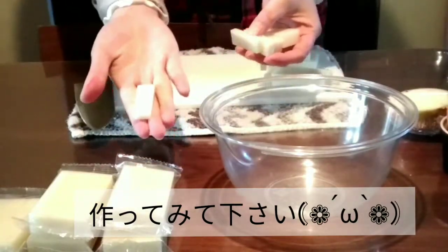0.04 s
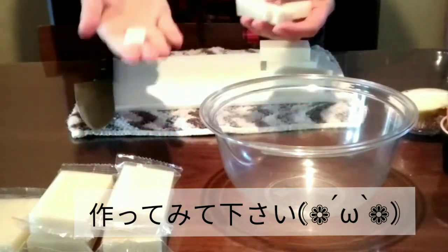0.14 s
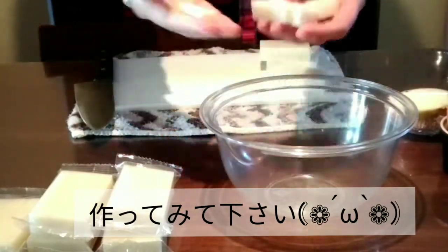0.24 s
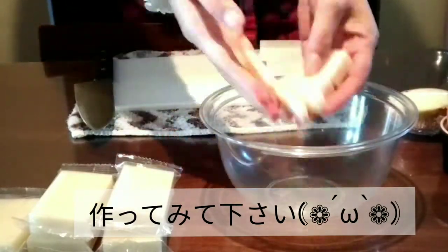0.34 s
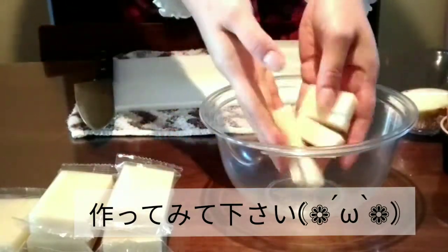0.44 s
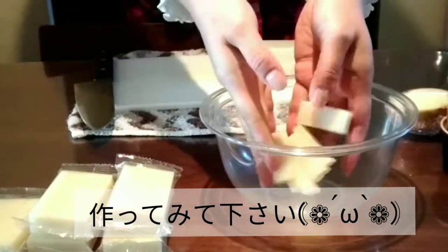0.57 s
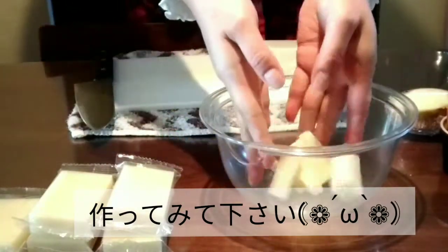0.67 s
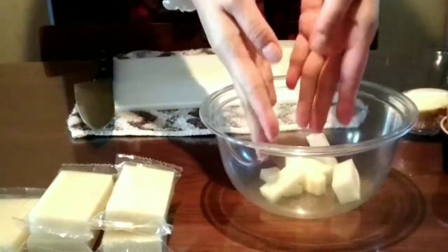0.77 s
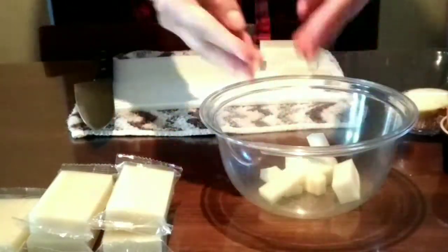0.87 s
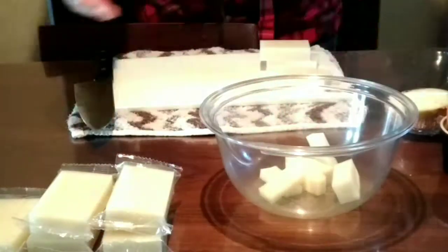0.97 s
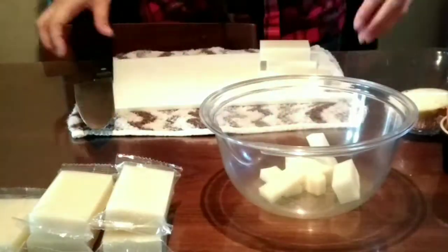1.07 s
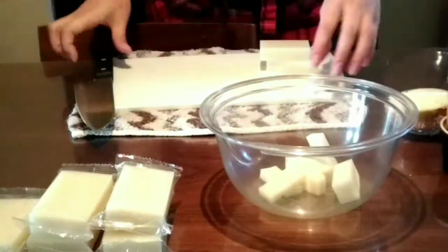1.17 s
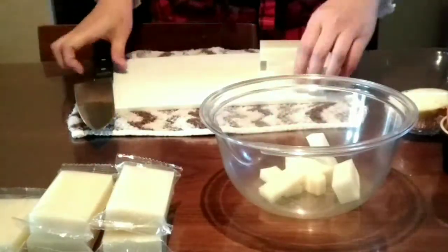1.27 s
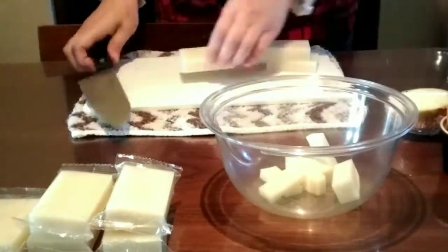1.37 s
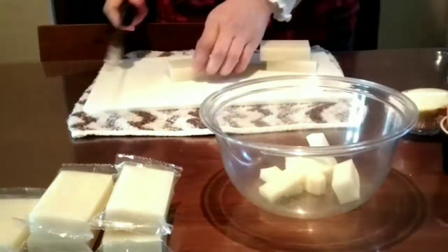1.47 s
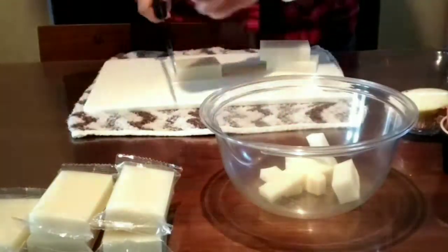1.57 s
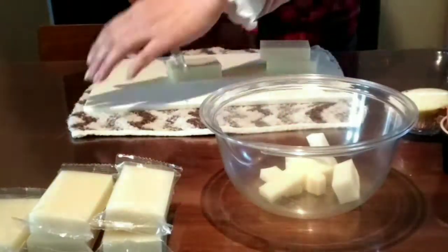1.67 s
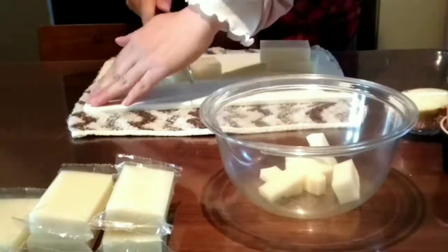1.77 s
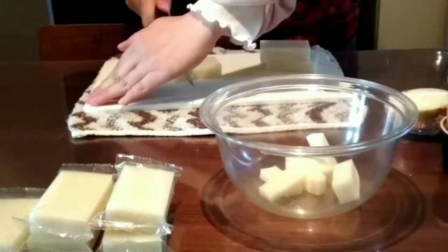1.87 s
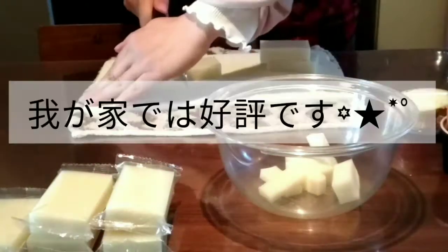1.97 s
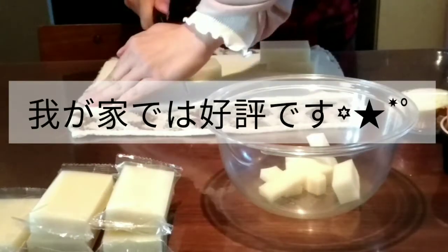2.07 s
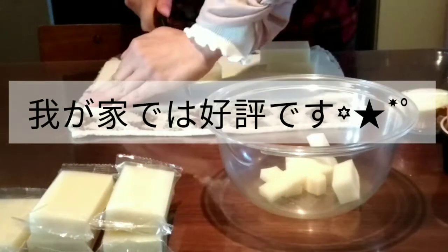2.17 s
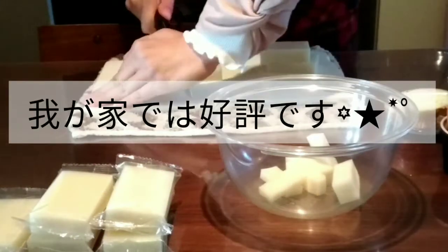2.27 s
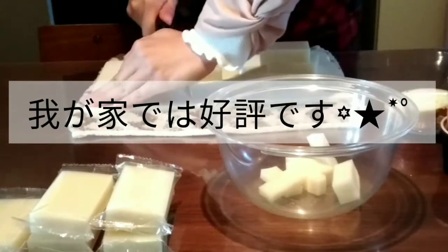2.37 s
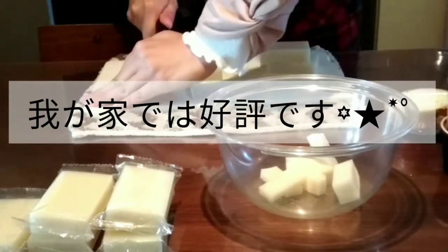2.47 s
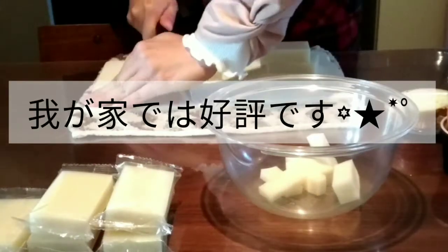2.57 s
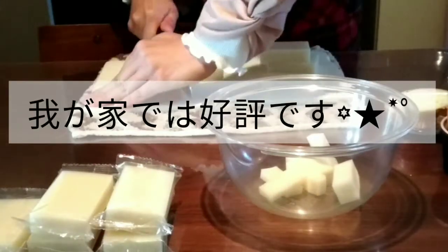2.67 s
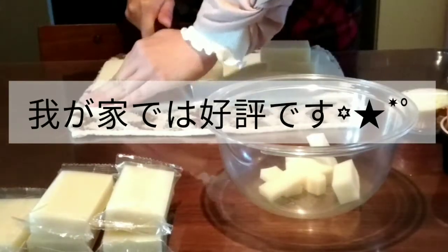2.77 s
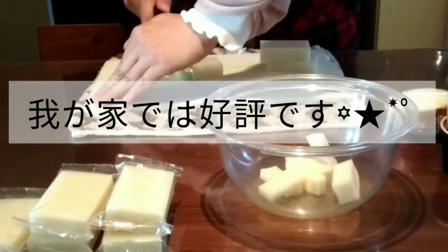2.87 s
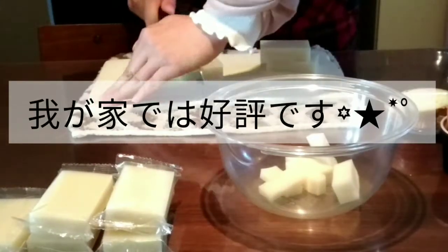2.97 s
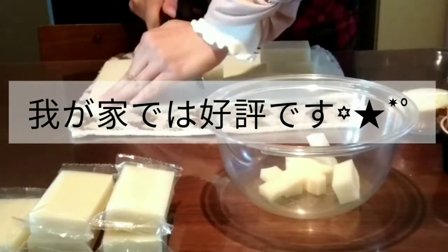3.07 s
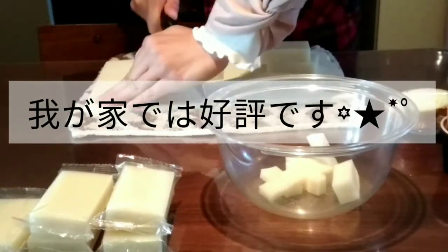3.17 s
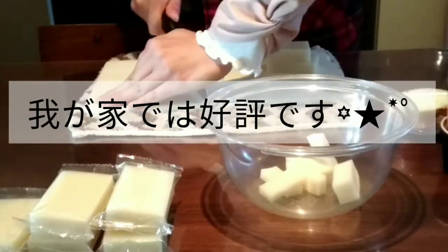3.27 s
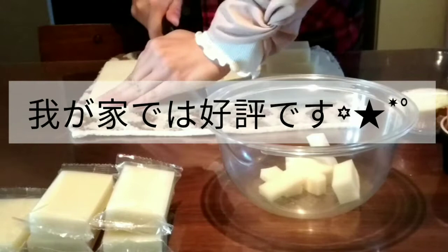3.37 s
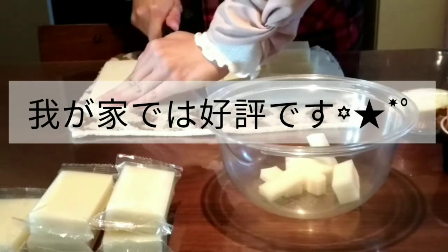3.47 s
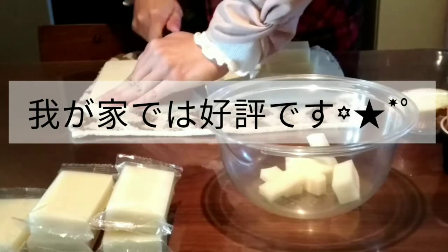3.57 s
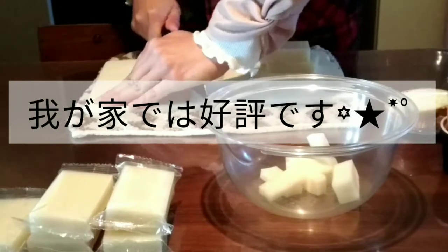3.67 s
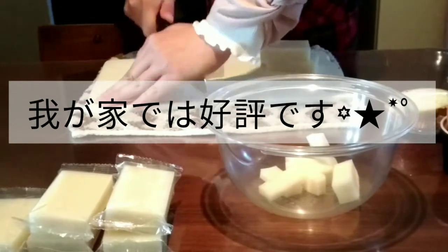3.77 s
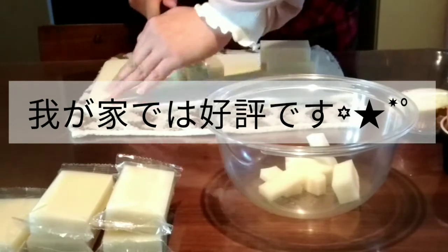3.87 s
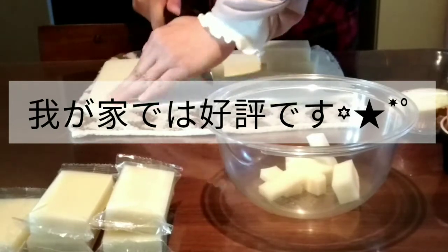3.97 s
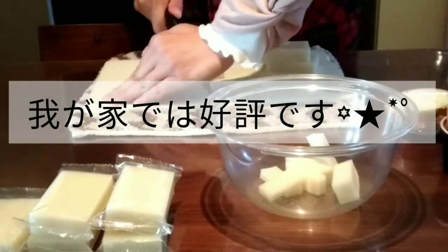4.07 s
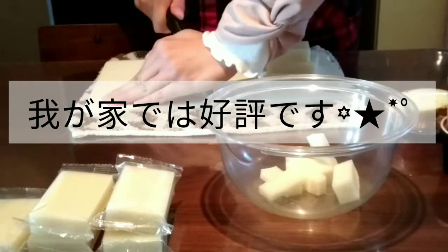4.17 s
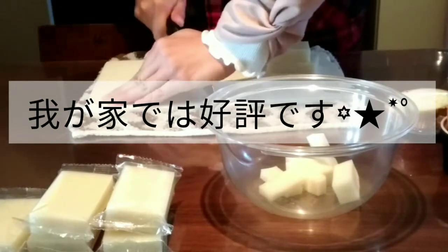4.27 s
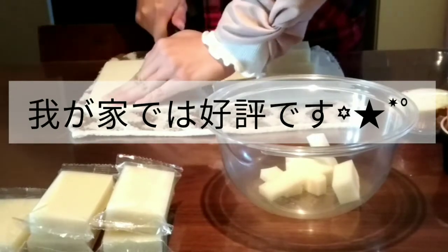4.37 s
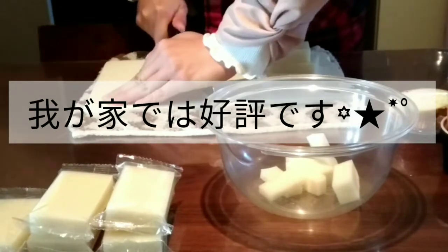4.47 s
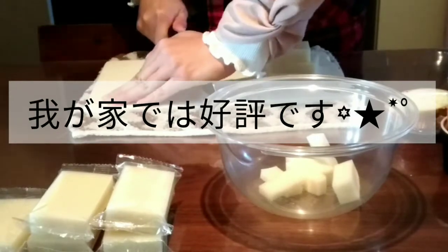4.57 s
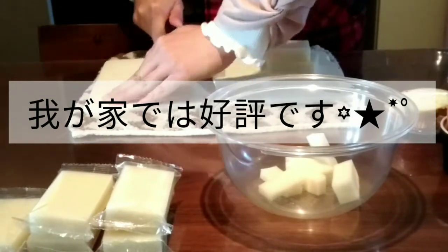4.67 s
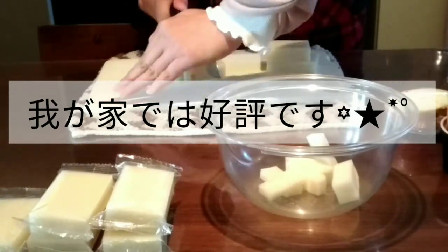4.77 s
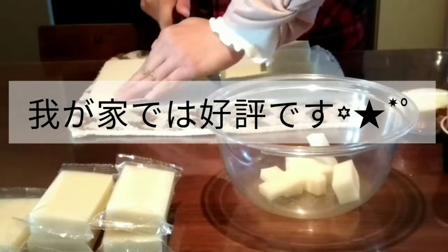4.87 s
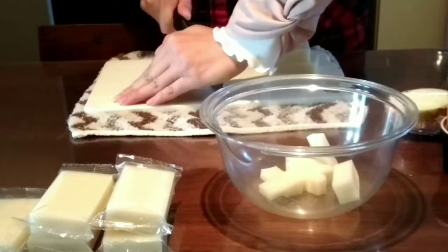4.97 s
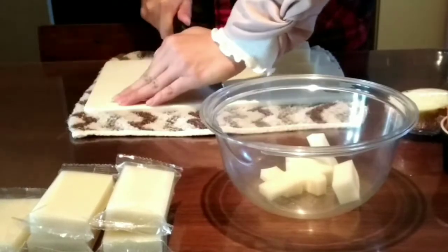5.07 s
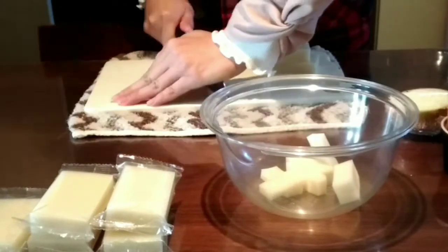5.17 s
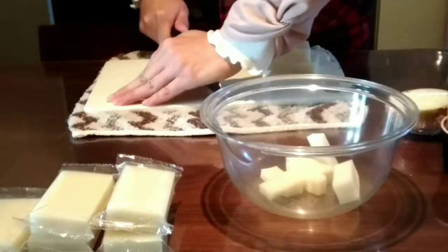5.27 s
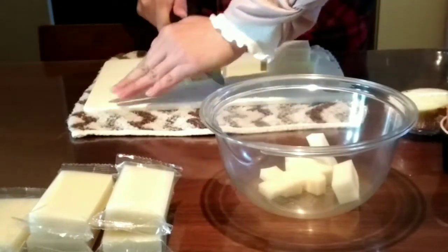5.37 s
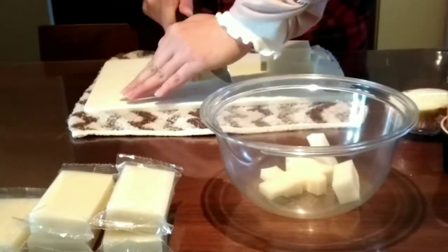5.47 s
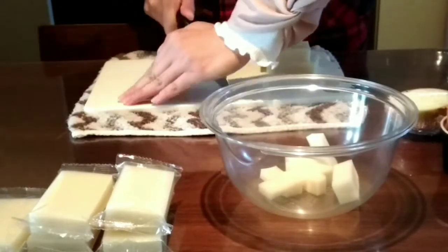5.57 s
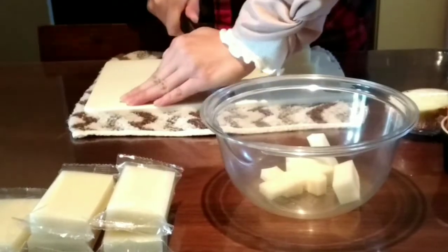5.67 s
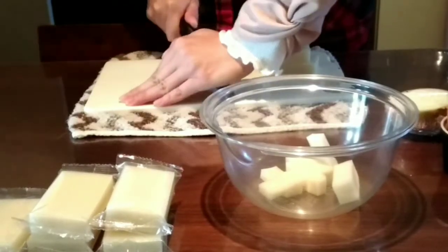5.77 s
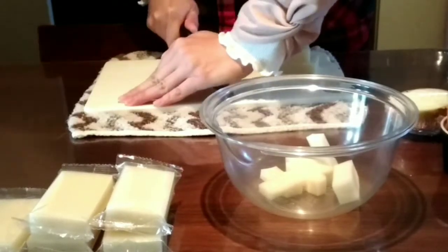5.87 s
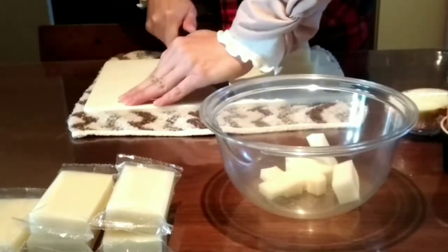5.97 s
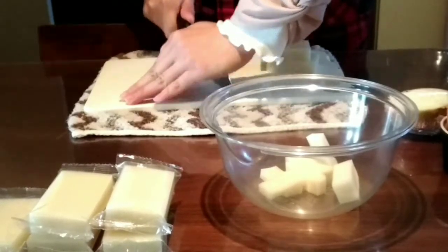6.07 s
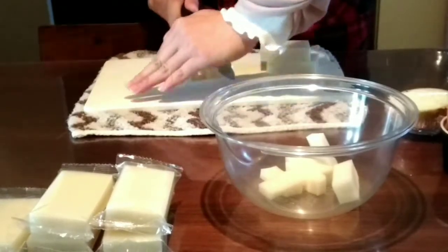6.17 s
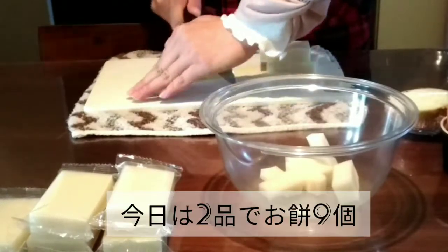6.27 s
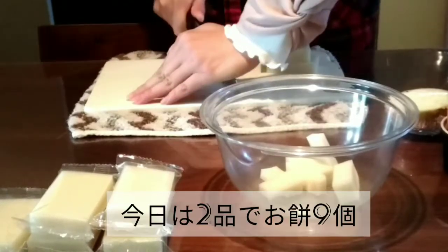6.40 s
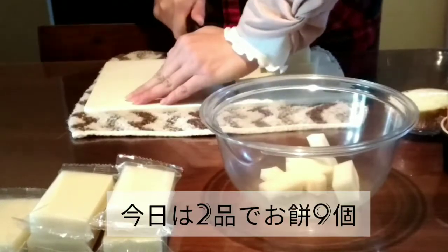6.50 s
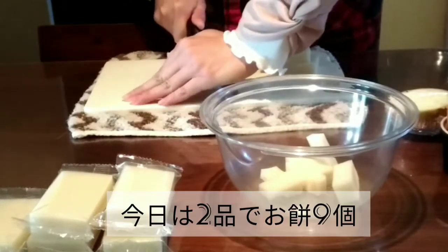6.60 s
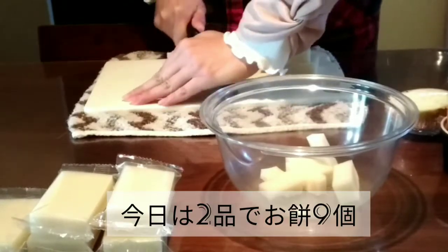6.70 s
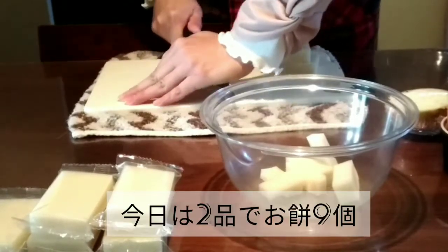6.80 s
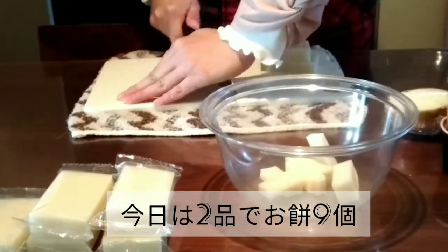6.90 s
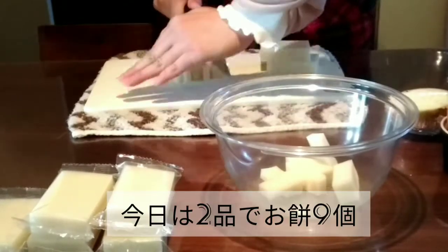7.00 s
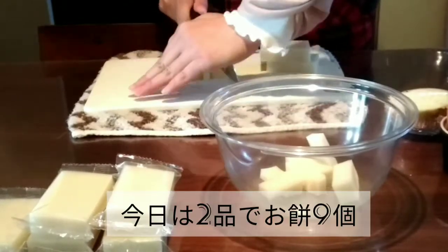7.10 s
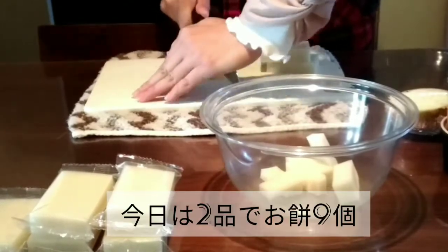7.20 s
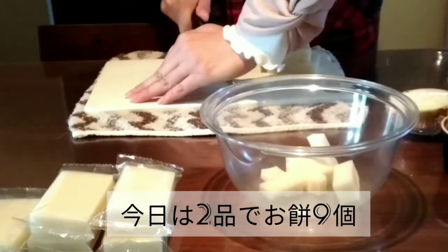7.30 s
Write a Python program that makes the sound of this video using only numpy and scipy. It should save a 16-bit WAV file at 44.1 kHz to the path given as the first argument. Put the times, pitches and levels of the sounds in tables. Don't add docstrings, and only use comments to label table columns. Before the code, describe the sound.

A brief burst of hard, dull knocks and small glassy clinks comes first as pieces drop into a bowl. Then sparse cutting: light touches, a strong wooden knock, sharp dry cracks from the block, a stepped crunch with a low table thump, and a final soft press and push. The close microphone catches small dry room echoes, low hum and passing tyres outside.

```python
import sys
import numpy as np
from scipy import signal
from scipy.io import wavfile

SR = 44100
rng = np.random.default_rng(int(sys.argv[2]) if len(sys.argv) > 2 else 0)


def to_wav(sig):
    pcm = np.clip(np.atleast_2d(sig), -1, 1) * 32767
    pcm = np.round(pcm).astype(np.int16)
    wavfile.write(sys.argv[1], SR, pcm.T)


def volts_from_db(level):
    exponent = np.asarray(level, float) / 20
    return 10 ** exponent


N = 323782

# (time [s], knock [dB], bowl foot [dB], crackle [dB])
DROP_LANDINGS = [(0.337, -56.5, -65, -90), (0.456, -48, -59, -69), (0.479, -65, -55, -67),
                 (0.504, -49.5, -55.5, -70), (0.5511, -23, -32.5, -53), (0.555, -50, -46, -47.5),
                 (0.571, -55, -38.5, -55), (0.58, -41, -40, -54.5), (0.591, -49, -40, -69),
                 (0.601, -37.5, -44, -53.5), (0.607, -53, -36.5, -60.5), (0.619, -64, -37.5, -59),
                 (0.634, -21, -38, -45), (0.642, -30, -33, -63.5), (0.647, -45, -54, -72),
                 (0.663, -55, -60, -64)]
# (time [s], knock [dB], knock pitch [Hz], edge [dB], loss per further crack [dB])
BLOCK_CRACKS = [
    (3.66, -29, 846, -46.5, 14.5),
    (4.563, -47, 816, -84, 22),
    (4.58, -31.5, 807, -42, 5),
    (4.598, -38.5, 890, -49, 4.5),
    (4.622, -50, 1000, -54, 3),
]
# (time [s], knock [dB], board [dB], crackle [dB])
FIRST_CUT = [
    (2.372, -55, -41, -75),
    (2.378, -55, -43, -70),
    (2.385, -62, -40.5, -69),
    (2.396, -60, -47.5, -63),
    (2.409, -60, -51, -66),
]
HARD_CUT = [
    (5.039, -46, -30, -47),
    (5.045, -32, -43, -51),
    (5.05, -31, -31, -52),
    (5.061, -36, -35.5, -61),
    (5.067, -35, -36, -62),
    (5.074, -43, -37.5, -64),
    (5.086, -59, -52, -72),
    (5.098, -48, -41.5, -60),
]
LAST_CUT = [
    (6.644, -59, -47.5, -62),
    (6.652, -60, -52.5, -64),
    (6.665, -53, -41, -68),
    (6.681, -65, -52, -66),
    (6.698, -67, -59, -67),
]


def rms_one(x):
    return x / np.sqrt(np.mean(x ** 2) + 1e-20)


def at_hz(points, hz):
    table = np.array(points)
    return np.interp(np.log(hz), np.log(table[:, 0]), table[:, 1])


def drift(rate):
    r = np.exp(-80 * np.pi * rate / SR)
    steps = rng.standard_normal(N // 40 + 2002)
    slow = signal.lfilter([1], [1, -2 * r, r * r], steps)[2000:]
    return np.interp(np.arange(N) / 40, np.arange(len(slow)), rms_one(slow))


def smooth(x, seconds):
    r = np.exp(-1 / (seconds * SR))
    return signal.lfilter([1 - r], [1, -r], x)


def band(x, low_hz, high_hz, order):
    return signal.sosfilt(signal.butter(order, [low_hz, high_hz], "band", fs=SR, output="sos"), x)


def ring(clicks, hz, t60):
    r, w = volts_from_db(-60 / (t60 * SR)), 2 * np.pi * hz / SR
    return signal.lfilter([0, np.sin(w)], [1, -2 * r * np.cos(w), r * r], clicks + 1e-18)


def clicks_at(times, level_db):
    out = np.zeros(N)
    out[(np.asarray(times) * SR).astype(int)] = volts_from_db(level_db)
    return out


def strike(times, level_db, modes, spread_db, contact_s):
    share_db = spread_db * rng.standard_normal((len(times), len(modes)))
    rings = np.zeros(N)
    for k, (hz, db, t60) in enumerate(modes):
        blows = clicks_at(times, level_db + db + share_db[:, k])
        rings += (-1) ** k * ring(blows, hz, t60)
    return -smooth(smooth(rings, contact_s), contact_s)


def knocks(times, level_db, pitch_hz, cycles):
    out, t = np.zeros(N), np.arange(6000) / SR
    for s, db, hz, turns in np.broadcast(times, level_db, pitch_hz, cycles):
        age = t * hz / turns
        swell = (age * np.exp(1 - age)) ** 2
        start = int(s * SR)
        out[start:start + len(t)] -= volts_from_db(db) * swell * np.sin(2 * np.pi * hz * t)
    return out


def contact(rows, body, body_db, knock_hz, overtone_db, cycles):
    s, knock, body_share, _ = np.transpose(rows)
    rung = strike(s, body_share + body_db, body, spread_db=3, contact_s=.00025)
    overtone = overtone_db + 0.79 * (knock + 45)
    return rung + knocks(s, knock, knock_hz, cycles) + knocks(s, overtone, 1200, cycles=1.05)


def crumbs(rows, rise_s, fall_s):
    s, crackle = np.transpose(rows)[[0, -1]]
    return smooth(smooth(clicks_at(s, crackle), rise_s), fall_s) * fall_s * SR


def strokes(start_s, level_db, held_s, rise_db_per_s, fall_db_per_s):
    late = np.arange(N)[:, None] / SR - start_s
    rise = rise_db_per_s * np.minimum(late, 0)
    fall = fall_db_per_s * np.maximum(late - held_s, 0)
    return np.max(level_db + rise - fall, axis=1)


def banded_noise(spectrum, patchy_db):
    # (frequency [Hz], likeness [-1 to 1])
    likeness = [(60, 0.88), (180, 0.93), (550, 0.47), (1640, -0.23), (4960, 0.17), (14900, -0.21)]
    out, edges = 0, 25 * 2 ** np.arange(0, 9.4, 1 / 3)
    white = rng.standard_normal((2, 2, N + 8000))
    for k, (low, high) in enumerate(zip(edges, edges[1:])):
        mid, side = band(white[k % 2], low, high, order=2)[:, -N:]
        hz = np.sqrt(low * high)
        alike = np.clip(at_hz(likeness, hz), -1, 1)
        gain = volts_from_db(at_hz(spectrum, hz) + patchy_db * drift(19.6))
        out = out + gain * (np.sqrt(1 + alike) * mid + np.sqrt(1 - alike) * side * [[1], [-1]])
    return rms_one(out)


def room_hum():
    # (frequency [Hz], level [dB per Hz])
    hum_spectrum = [(15, -36), (25, -2), (55, 0), (94, -3), (119, -7.5), (202, -2), (237, -11), (353, -9),
                    (448, -14), (539, -15), (584, -21), (1050, -20.5), (1360, -23.5), (2940, -28),
                    (14000, -37.5)]
    return volts_from_db(-61.5 + 0.5 * drift(1.0)) * banded_noise(hum_spectrum, patchy_db=1.55)


def road_outside():
    # (frequency [Hz], level [dB per Hz])
    road_spectrum = [(250, 0), (500, 11), (950, 9), (1500, 5), (2240, 7), (3000, -7.5), (5000, -73)]
    # (time [s], level [dB])
    traffic = [
        (0, -71),
        (.8, -74),
        (2.2, -81),
        (3.5, -72.5),
        (4.5, -64),
        (5.9, -69),
        (6.45, -76),
        (7.34, -67),
    ]
    s, db = np.transpose(traffic)
    level_db = np.interp(np.arange(N) / SR, s, db, left=-140, right=-140)
    return volts_from_db(level_db) * banded_noise(road_spectrum, patchy_db=0.15)


def room_echoes(x):
    t60_s = 0.12
    t = np.arange(int(.4 * SR)) / SR
    hits = rng.random((2, len(t))) < .02 + 3.0 * t
    echoes = rng.standard_normal((2, len(t))) * hits
    echoes = echoes / np.sqrt(0.0071 + 8.7 * t) * volts_from_db(-60 * t / t60_s) * (t > .004)
    echoes = band(echoes, 600, 4900, order=1)
    echoes = echoes / np.sqrt(np.sum(echoes ** 2) / 2)
    return signal.fftconvolve(x[None], echoes, axes=1)[:, :N]


def table_thumps():
    # (time [s], level [dB], pitch [Hz], time to the peak [cycles])
    thumps = [(0.55, -36.5, 123, 1.5), (0.575, -45, 101, 0.88), (0.601, -54, 89, 0.82),
              (0.638, -44, 106, 1), (1.232, -50.5, 195, 1.6), (2.385, -33.5, 86.5, 0.4),
              (2.405, -46, 64, 1.34), (2.527, -37.5, 103, 1.5), (2.531, -40.5, 63.6, 1.37),
              (4.4228, -39, 63, 0.48), (4.587, -48.5, 374, 1.8), (5.045, -34.5, 64, 1.05),
              (5.049, -32.5, 105, 1), (5.069, -50, 70, 2.4), (5.793, -38, 76, 0.94),
              (6.642, -36, 78.5, 0.91), (6.658, -41.5, 121, 0.88), (6.695, -46, 70, 0.73),
              (5.834, -50, 65, 0.91), (.005, -56, 47.3, 1.9), (.11, -64, 44.6, 1.7)]
    return knocks(*np.transpose(thumps))


def slides():
    # (time [s], rub [dB], rustle [dB], held [s])
    moves = [
        (.464, -67, -92, .005),
        (.488, -78, -66, .002),
        (1.336, -63, -70.5, 0.013),
        (1.402, -88, -69, .002),
        (1.43, -84, -71.5, 0.07),
        (3.452, -91, -60.5, .002),
        (6.764, -62, -72.5, 0.0064),
        (6.815, -54.5, -71, 0.0027),
    ]
    s, rub, rustle, held = np.transpose(moves)
    rub_db = strokes(s, rub, held, rise_db_per_s=650, fall_db_per_s=750)
    rustle_db = strokes(s, rustle, held, rise_db_per_s=650, fall_db_per_s=750)
    slips = (rng.random(N) < 2500 / SR) * rng.standard_normal(N)
    stirred = ring(slips, 820, .012) - .6 * ring(slips, 500, .014) - .7 * ring(slips, 1200, .008)
    rubbing = rms_one(band(stirred, 250, 1430, order=2)) * smooth(volts_from_db(rub_db), 0.005)
    return rubbing, smooth(volts_from_db(rustle_db), 0.0013)


def blade_drag():
    # (time when loudest [s], level [dB])
    drags = [
        (1.69, -78.5),
        (1.99, -80),
    ]
    s, db = np.transpose(drags)
    level_db = strokes(s, db + 2.5, 0, rise_db_per_s=103, fall_db_per_s=101)
    return volts_from_db(level_db) * rms_one(band(rng.standard_normal((2, N)), 2470, 3140, order=2))


def ticks():
    # (time [s], level [dB], fall [s])
    edge_contacts = [(.477, -61, .004), (0.4805, -55.5, .004), (0.55, -40, 0.0012), (0.5517, -33.5, 0.001),
                     (0.568, -48, .001), (0.6052, -43, 0.0012), (.6085, -57, 0.0013), (0.6345, -49, 0.0013),
                     (0.642, -41, 0.0019), (0.648, -55, 0.0016), (.652, -53, 0.0017), (.581, -48, 0.0014),
                     (.596, -53, .0013), (.619, -56, .0013), (2.516, -58, 0.0047), (2.5241, -48, 0.0016),
                     (2.529, -53, 0.0045), (5.047, -51.5, 0.0041), (5.057, -53, .005), (5.786, -68, .004),
                     (5.7906, -65, 0.0024), (5.797, -67, 0.0033), (5.803, -59, .004), (6.645, -63, .004),
                     (6.653, -54, 0.0028), (6.661, -56, 0.0031)]
    return sum(crumbs([(s, db)], .0001, fall) for s, db, fall in edge_contacts)


def taps():
    # (time [s], level [dB], pitch [Hz], time to the peak [cycles])
    single_knocks = [(0.5497, -22, 542, 0.46), (.5518, -30, 331, 0.59), (0.5623, -35, 275, 1.3),
                     (0.6444, -31.5, 1290, 0.98), (0.65, -38, 1170, 0.85), (0.655, -47, 1410, 0.96),
                     (1.322, -53, 780, 1.3), (1.3345, -48, 684, 1.1), (1.346, -57, 900, 0.34),
                     (1.356, -56, 790, 0.84), (1.329, -46.5, 200, 0.57), (1.363, -53, 230, 0.57),
                     (2.3729, -40.5, 530, 0.83), (2.5229, -19, 493, 0.47), (2.5295, -46, 1190, 1),
                     (.458, -52, 1360, 1.1), (3.665, -62, 3560, 1.3), (2.5277, -27, 416, 0.41),
                     (2.533, -27, 251, 0.53), (2.5386, -39, 328, 0.83), (2.5434, -31, 230, 0.56),
                     (3.6587, -40, 1820, 1.7), (3.6592, -48, 2480, 2.4), (3.659, -55, 3100, 1.8),
                     (3.667, -60, 3100, 2.2), (3.671, -57, 1350, 1.5), (3.675, -57, 1020, 1.8),
                     (4.58, -38.5, 1820, 2.4), (4.586, -47, 1500, 1.1), (4.594, -38, 1310, 0.82),
                     (4.595, -42, 2100, 1.7), (4.604, -56, 1400, 1.1), (4.616, -46, 1090, 1.2),
                     (4.581, -62, 3300, 1.8), (4.591, -55, 3170, 2.5), (4.603, -57, 2800, 2),
                     (4.617, -50, 2300, 2.2), (5.787, -66, 5700, 15), (5.796, -63, 5570, 16),
                     (6.644, -63, 4700, 10), (6.654, -63, 1290, 1.2), (6.664, -54, 1160, 0.9),
                     (3.6595, -59, 3600, 1.7), (5.049, -26, 366, 0.26), (5.0563, -34.5, 1130, 2.1),
                     (5.062, -30.5, 366, 0.91), (5.0375, -41, 600, 1.1), (6.767, -56, 1310, 0.95),
                     (6.817, -47.5, 883, 1.8), (6.823, -51, 1170, 0.7)]
    return knocks(*np.transpose(single_knocks))


def bowl_landings():
    # (frequency [Hz], level [dB], t60 [s])
    foot_modes = [(200, -4.5, 0.11), (290, -12, 0.11), (332, -3.5, 0.085), (397, -5.5, 0.1),
                  (536, -6, 0.093), (810, -27, 0.074), (1110, -12, 0.068), (1520, -26, 0.065)]
    return contact(DROP_LANDINGS, foot_modes, body_db=0.5, knock_hz=807, overtone_db=-53.5, cycles=1.0)


def glass():
    # (frequency [Hz], level [dB], t60 [s])
    bowl_modes = [(1550, -9, 0.075), (2480, -17, 0.065), (2960, -15, 0.082), (3150, -3, 0.063),
                  (3270, 2, 0.084), (3730, 1, 0.035), (4620, -25, .09), (5050, -5, 0.039)]
    blade_modes = [(3300, 0.5, 0.075), (6640, -10, 0.2), (7560, -11, 0.087)]
    s, crackle = np.transpose(DROP_LANDINGS)[[0, -1]]
    level_db = np.minimum(crackle, -48) - 12
    clinks = strike(s, level_db, bowl_modes, spread_db=5.0, contact_s=.00001)
    return clinks + strike([1.234], -66, blade_modes, spread_db=1.5, contact_s=.00001)


def rattle():
    # (frequency [Hz], level [dB], t60 [s])
    rim_modes = [(1670, -6.5, 0.028), (2550, -13, 0.042), (3018, -4, 0.048), (3340, -4.5, 0.031),
                 (3910, -10.5, 0.034), (4590, -8.5, 0.036), (5080, -9, 0.02), (6480, -9, 0.032),
                 (7960, -8, 0.022)]
    touches = (rng.random((2, N)) < 600 / SR) * rng.standard_normal((2, N))
    touches = touches + 0.57 * touches[::-1].mean(axis=0)
    touches = touches * crumbs(DROP_LANDINGS, 0.00045, 0.0093)
    return volts_from_db(-2.5) * sum(volts_from_db(db) * ring(touches, hz, t60) for hz, db, t60 in rim_modes)


def blade_landings():
    # (time [s], knock [dB], board [dB], crackle [dB], how fast the rebounds die [dB])
    landings = [
        (1.232, -56, -52.5, -67.5, 12),
        (2.5228, -45, -31, -59, 5),
        (4.076, -67, -56.5, -78, 12),
        (4.42, -69, -53.5, -66, 13),
        (5.79, -47, -51.5, -61, 3.5),
    ]
    first_gap_s, slows = 0.00577, 1.3
    out = []
    for s, knock, board, crackle, loss in landings:
        out.append((s, knock, board, crackle))
        for k in range(1, 4):
            s, left = s + first_gap_s * slows ** (k - 1), board - loss * k * k
            out.append((s, left, left, left - 57))
    return out


def board_blows(landings):
    # (frequency [Hz], level [dB], t60 [s])
    free_board = [(195, 2.5, 0.14), (233, -42, 0.039), (288, -8, 0.061), (360, -3.5, 0.087),
                  (430, -3, 0.056), (512, 1.5, 0.036), (568, 1, 0.06), (733, -38, 0.061), (800, -4, 0.06),
                  (930, 3, 0.035), (1140, -3, 0.023), (1340, -36, 0.023), (1490, -44, .02)]
    hand_at_edge = [(190, 2, 0.07), (230, -12, 0.081), (290, -13, 0.13), (357, 2.5, 0.11), (445, -4, 0.027),
                    (495, -4, 0.067), (544, 5.5, 0.043), (684, -13, 0.06), (860, -13, 0.017),
                    (930, 0.5, 0.038), (1130, -2, 0.038), (1380, 7, 0.014), (1540, -32, 0.05)]
    hand_pressing = [(194, 4.5, 0.053), (230, -13, 0.082), (295.5, -12, 0.17), (366, 1, 0.059),
                     (450, -7.5, 0.025), (490, 0.5, 0.038), (585, 4, 0.019), (758, -4, 0.059),
                     (860, -4, 0.012), (960, 3.5, 0.047), (1130, 1, 0.043), (1330, 4, 0.016),
                     (1540, -22, 0.051)]
    hand_in_middle = [(195, 8, 0.092), (230, -8, 0.073), (282, -7, 0.1), (366, 4.5, 0.067),
                      (450, -1.5, 0.031), (507, -1.5, 0.037), (578, 2.5, 0.018), (750, -4.5, 0.055),
                      (860, -10, 0.02), (966, -3, 0.038), (1130, -7, 0.043), (1360, 0.5, 0.011),
                      (1540, -20, 0.03)]
    out = contact(landings, free_board, body_db=-4.0, knock_hz=546, overtone_db=-63.0, cycles=0.44)
    cuts = [(FIRST_CUT, hand_at_edge), (HARD_CUT, hand_pressing), (LAST_CUT, hand_in_middle)]
    for rows, body in cuts:
        out = out + contact(rows, body, body_db=-3.5, knock_hz=734, overtone_db=-47.5, cycles=0.47)
    return out


def splintering(grit):
    cracks = crumbs([(s, edge) for s, _, _, edge, _ in BLOCK_CRACKS], 0.00037, 0.0089)
    settling = crumbs(HARD_CUT + LAST_CUT, 0.0027, 0.025)
    fibres = volts_from_db(-5.5) * cracks * band(grit, 960, 3700, order=4)
    return fibres + volts_from_db(-0.5) * settling * band(grit, 630, 2150, order=2)


def snaps():
    gap_s, rises, edge_fades = 0.0088, 0.049, 3.1
    steps = []
    for s, db, hz, edge, loss in BLOCK_CRACKS:
        for k in range(3):
            steps.append((s + gap_s * k, db - loss * k, hz * (1 + rises * k), edge - edge_fades * loss * k))
    s, knock, knock_hz, _ = np.transpose(steps)
    splinter = crumbs(steps, 0.00015, 0.002) * rng.standard_normal(N)
    splinter = band(band(splinter, 1100, 2300, order=1), 560, 3900, order=4)
    return knocks(s, knock, knock_hz, cycles=0.98) + volts_from_db(10.5) * splinter


def crackling(landings, rustle):
    # (frequency [Hz], level [dB per Hz])
    grit_spectrum = [(700, 1.5), (1300, -1), (2000, -6), (3100, -5.5), (5000, -8.5), (8800, -5.5),
                     (11000, -34), (14500, -12.5)]
    grit = banded_noise(grit_spectrum, patchy_db=0.7)
    first_touch = crumbs(landings, .0001, 0.00074)
    crackle = first_touch + 0.96 * crumbs(DROP_LANDINGS, 0.0015, 0.015) + crumbs(landings, 0.00017, 0.035)
    crunch = crumbs(FIRST_CUT + HARD_CUT + LAST_CUT, 0.0019, 0.01)
    dull = band(grit, 470, 9200, order=6) + volts_from_db(-43) * grit
    lumps = volts_from_db(2.5 * drift(89))
    crumbling = volts_from_db(2.0) * crackle * dull + crunch * smooth(dull, .00003) + splintering(grit)
    rustling = volts_from_db(1.0) * rustle * band(grit, 2000, 9500, order=1)
    return lumps * (crumbling + volts_from_db(1.0) * ticks() * grit + rustling + blade_drag())


def scene():
    background = (room_hum() + road_outside()) * volts_from_db([[.3], [-.3]])
    landings = blade_landings()
    rub, rustle = slides()
    near = bowl_landings() + board_blows(landings) + glass() + rub + taps()
    cracks = snaps()
    direct = (table_thumps() + near) * volts_from_db([[.4], [-.4]]) + cracks * volts_from_db([[.5], [-.5]])
    sent = volts_from_db(-11.5) * near + volts_from_db(-6.0) * cracks + volts_from_db(-12.0) * band(cracks, 1200, 3200, order=2)
    return direct + room_echoes(sent) + crackling(landings, rustle) + rattle() + background


def band_limit(x):
    return signal.sosfilt(signal.butter(12, 15540, fs=SR, output="sos"), x)


def record(dry):
    heard = signal.sosfilt(signal.butter(2, 36.7, "high", fs=SR, output="sos"), dry)
    heard = signal.sosfilt(signal.ellip(14, .5, 80, 14200, fs=SR, output="sos"), heard)
    return band_limit(heard)


dry = scene()
out = record(dry)
to_wav(out)
```